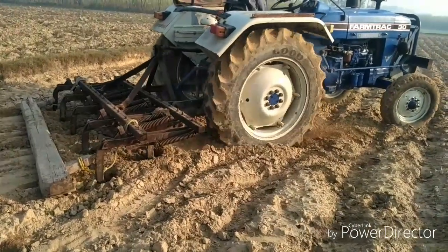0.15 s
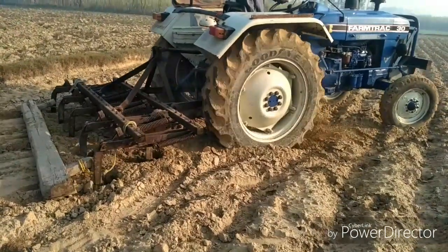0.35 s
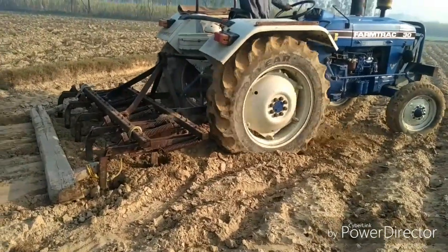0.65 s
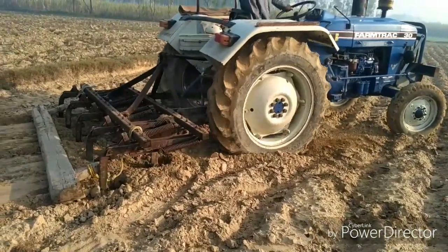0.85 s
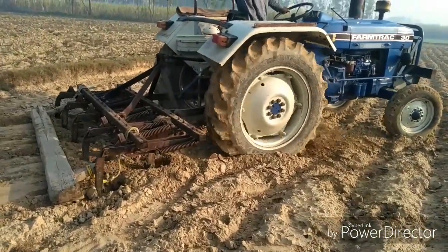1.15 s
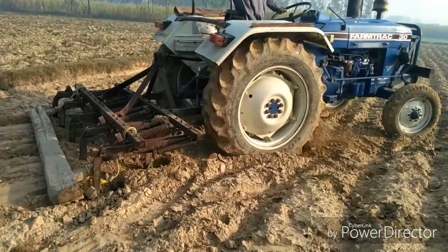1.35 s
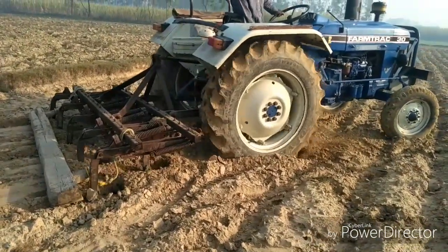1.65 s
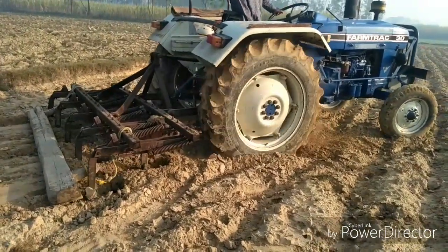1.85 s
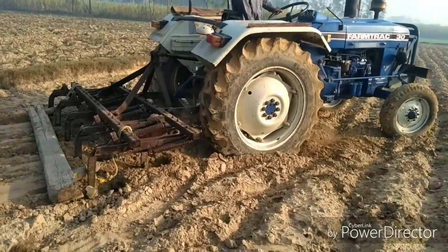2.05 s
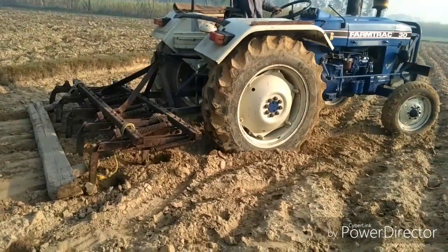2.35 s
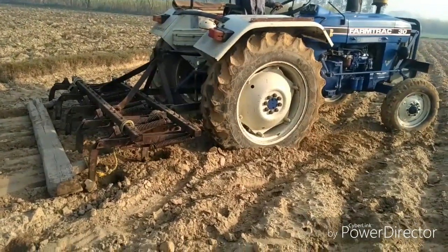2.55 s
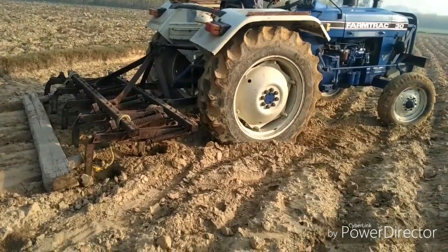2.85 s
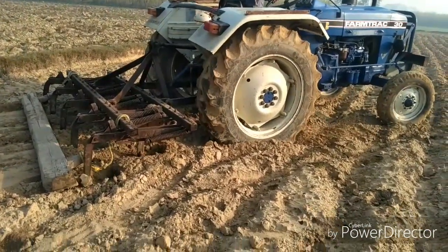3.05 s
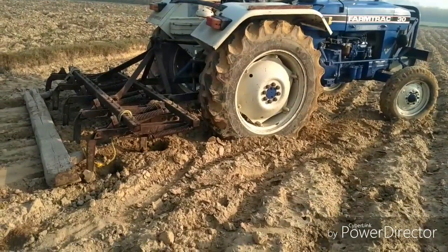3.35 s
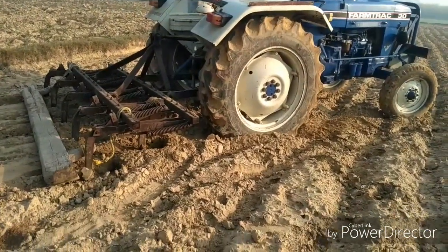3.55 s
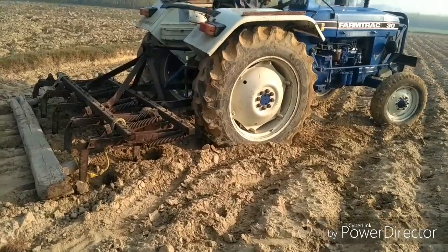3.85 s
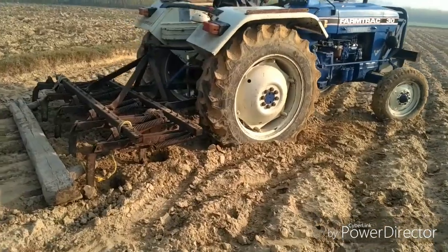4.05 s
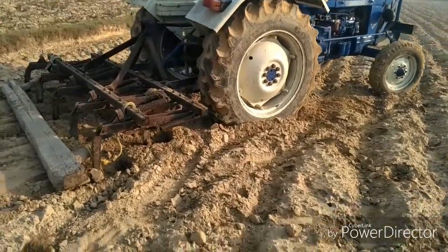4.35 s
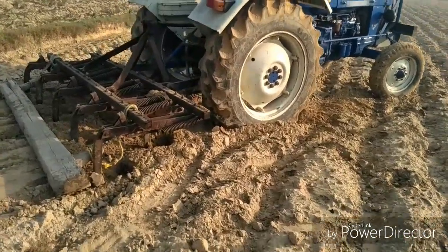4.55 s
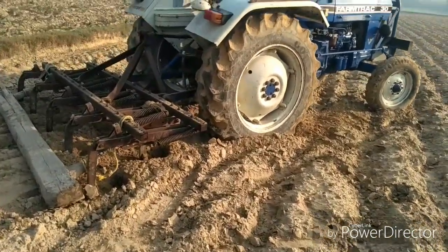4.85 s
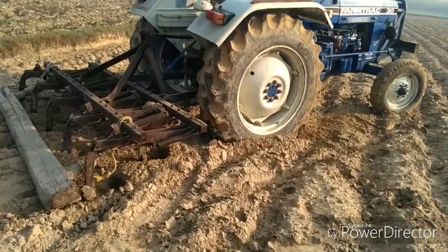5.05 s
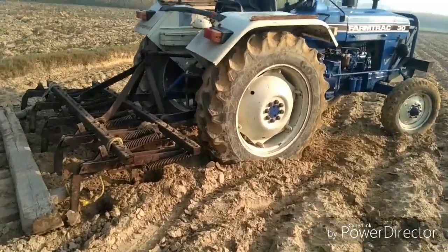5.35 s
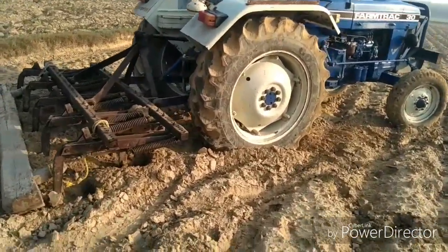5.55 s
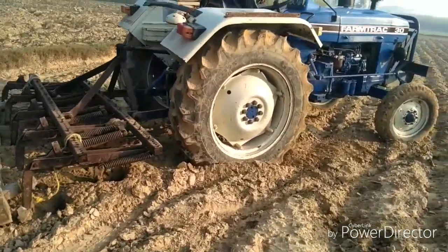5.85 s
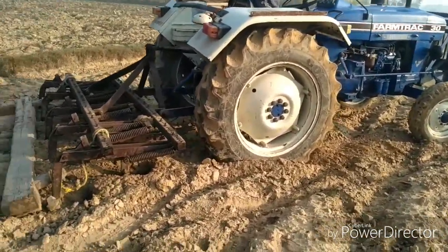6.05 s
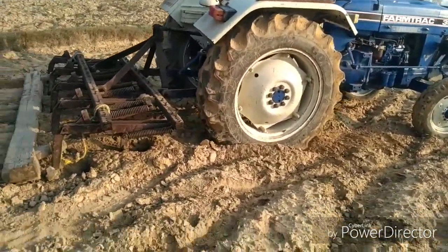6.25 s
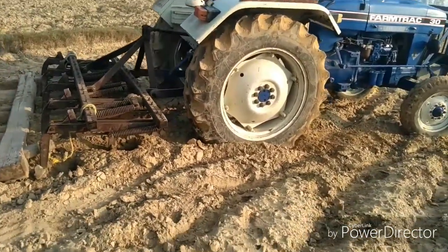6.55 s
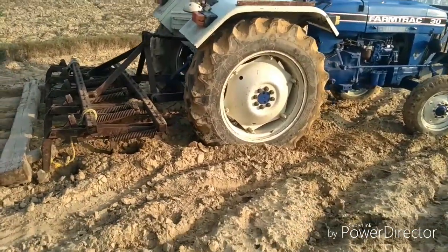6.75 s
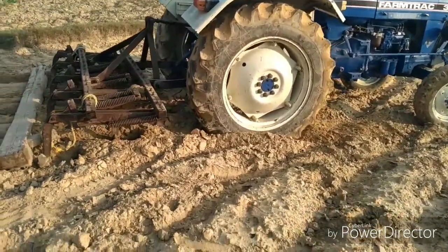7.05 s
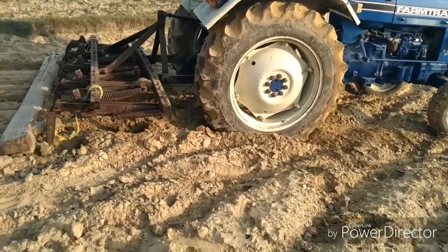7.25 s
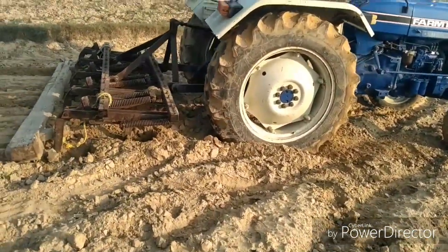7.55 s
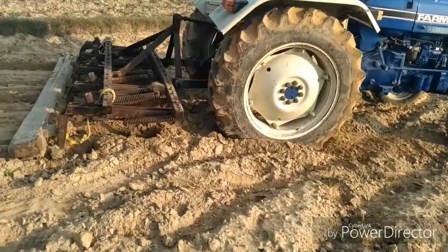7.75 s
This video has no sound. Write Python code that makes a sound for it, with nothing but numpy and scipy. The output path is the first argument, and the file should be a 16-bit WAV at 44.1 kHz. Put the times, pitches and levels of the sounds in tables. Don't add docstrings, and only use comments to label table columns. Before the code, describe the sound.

A small diesel tractor hammers under load in an open field, drops to a slow chug, revs up hard, then winds down again.

```python
import sys
import numpy as np
from scipy import signal
from scipy.io import wavfile
from scipy.ndimage import uniform_filter1d

SR = 44100
rng = np.random.default_rng(int(sys.argv[2]) if len(sys.argv) > 2 else 0)


def dump_mix(stems):
    frames = np.atleast_2d(stems).T
    limited = np.clip(frames, -1, 1)
    pcm = np.round(limited * 32767).astype(np.int16)
    wavfile.write(sys.argv[1], SR, pcm)


def gain_from_db(level_db):
    decades = np.asarray(level_db, float) / 20
    return 10 ** decades


N = 349272


def evened(x, span_s=0.22):
    size = int(span_s * SR)
    power = uniform_filter1d(uniform_filter1d(x ** 2, size=size), size=size)
    return x / np.sqrt(np.maximum(power, 1e-20))


def coloured(x, spectrum):
    size = 16384
    hz = abs(np.fft.fftfreq(size, 1 / SR))
    point_hz, point_db = np.transpose(spectrum)
    gain_db = np.interp(np.log(hz + 1), np.log(point_hz + 1), point_db)
    log_gain = np.log(gain_from_db(np.maximum(gain_db, -100)))
    taps = np.fft.ifft(np.exp(np.conj(signal.hilbert(log_gain)))).real[:size // 2]
    return signal.oaconvolve(x, taps)[:N]


def split(x, hz, kind):
    return signal.sosfilt(signal.butter(4, hz, kind, fs=SR, output="sos"), x)


def blows(firings, place, scatter_db, slack):
    luck = np.clip(rng.standard_normal((80, 2)), -1.7, 1.5)
    at = 3 * np.arange(len(luck)) + place + slack * luck[:, 0]
    out = np.zeros(N + 1)
    out[np.searchsorted(firings, at)] = gain_from_db(scatter_db * luck[:, 1])
    return out[:N]


def ring(clicks, hz, t60):
    t = np.arange(int(1.2 * t60 * SR)) / SR
    return signal.oaconvolve(clicks, gain_from_db(-60 * t / t60) * np.sin(2 * np.pi * hz * t))[:N]


def law_db(law, load, speed, flank):
    base_db, load_db, over_db, under_db, flank_db = law
    speed_db = over_db * np.maximum(speed, 0) + under_db * np.minimum(speed, 0)
    return base_db + load_db * load + speed_db + flank_db * flank


# place [firings], level_db, load_gain_db, t60_s, second_knock_gap_s, second_knock_db
KNOCKS = [
    (.6, -2, 9.5, 0.023, 0.0041, 11),
    (1.57, -4, 11, 0.046, 0.0045, 11),
    (2.59, 3, 5.5, 0.036, 0.0044, 7),
    (.2, -11, 10, 0.017, .01, -26),
    (1.2, -16.5, 9, 0.031, .01, -24),
    (1.3, -7.5, -18, 0.032, 0.011, -26),
    (1.77, 4.5, -14.5, 0.0075, .004, -12),
    (2.79, 5.5, -15, 0.013, .004, -16),
]
# place [firings], pitch_hz, level_db, t60_s, load_gain_db, speed_gain_db
RINGING_PARTS = [(1.66, 2800, 3, .045, 18, -3), (1.66, 2200, -8, .04, 12, -3), (2.62, 2080, -5, .05, 8, -3),
                 (2.66, 3350, -6, .04, -4, -3), (2.66, 2530, -7, .05, -8, 0), (2.64, 6120, -4, .04, 3, -5),
                 (.7, 4700, -8, .032, -4, 6), (2.7, 4950, -10, .02, -6, 3), (1.76, 8450, 0, .03, -4, 2),
                 (2.62, 8700, -1, .03, 3, 0), (.76, 9400, -4, .04, -4, -3), (.7, 11200, -2, .02, 0, 3),
                 (2.7, 12700, -6, .025, -3, 5), (1.78, 13700, -6, .02, -3, 8)]
# pitch_hz, level_db [dB per Hz]
HISS_BESIDE = [(710, -42), (1200, -5.5), (1510, -1), (1720, -17), (2040, -3), (2430, -7), (2760, -2.5),
               (4080, -13), (4800, -7.5), (6950, -11.5), (8720, -2), (10000, -5.5), (12300, -5),
               (15200, -16.5), (16000, -20)]
# pitch_hz, level_db [dB per Hz]
HISS_BEHIND = [(710, -36.5), (1200, 0.5), (1540, -1), (1980, -7.5), (2620, -1.5), (3290, -6), (3590, -3),
               (4170, -11.5), (4700, -5.5), (6230, -12), (7820, -8), (8720, -2.5), (13000, -4),
               (15000, -13.5), (16000, -11.5)]
# start_s, end_s
MOVE = (3.2, 4.5)


def clatter(t, firings, load, speed):
    age = np.arange(SR // 16) / SR
    power, struck = np.zeros(N), np.zeros(N)
    for place, db, load_db, t60, gap_s, second_db in KNOCKS:
        first = gain_from_db(2 * (db + load_db * load)) * blows(firings, place, 3.3, 0.0096)
        second = gain_from_db(2 * (db + second_db)) * np.roll(blows(firings, place, 2.0, 0.014), int(gap_s * SR))
        decay = gain_from_db(-120 * age / t60)
        power += signal.oaconvolve(first, decay * (1 - np.exp(-age / 0.0017)))[:N]
        power += signal.oaconvolve(second, decay * (1 - np.exp(-age / 0.0029)) ** 2)[:N]
        struck += first + second / 4

    fade = gain_from_db(-120 / (0.22 * SR))
    power += gain_from_db(-22.5 + 5.9 * speed) * signal.lfilter([1], [1, -fade], struck)
    power = evened(np.sqrt(np.maximum(power, 0))) ** 2 + gain_from_db(-21 + 3.8 * speed)

    rattle = gain_from_db(1.47 * evened(uniform_filter1d(rng.standard_normal(N), size=60)))
    drive = np.sqrt(power) * rattle * rng.standard_normal(N)
    moved = np.interp(t, MOVE, (0, 1))
    beside = evened(coloured(drive, HISS_BESIDE))
    behind = evened(coloured(drive, HISS_BEHIND))
    hiss = evened((1 - moved) * beside + moved * behind)

    rings = np.zeros(N)
    for place, hz, db, t60, load_db, speed_db in RINGING_PARTS:
        gain = gain_from_db(db + load_db * (load - 1.0) + speed_db * speed)
        rings += gain * ring(blows(firings, place, 4.0, 0.014), hz, t60)
    return hiss + gain_from_db(-0.5) * rings


# pitch_hz, level_db [dB per Hz]
ROAR_SPECTRUM = [(18, -15), (30, -27.5), (102, -1.5), (131, -0.5), (242, -12.5), (486, -15), (549, -10),
                 (794, -6), (994, -3), (1250, -13), (1560, -8), (1950, -11), (3000, -14.5), (3470, -11.5),
                 (4000, -16), (5200, -45), (8800, -120)]
# pitch_hz, level_db
STACK = [(38, -79), (50, -66.5), (60, -59.5), (72, -57), (82, -53.5), (95, -59), (108, -65)]
# pitch_hz, level_db
SILENCER = [(60, -30), (118, -11), (140, -13), (155, -18.5), (200, -16.5), (260, -27.5), (365, -19.5),
            (420, -32)]
# coasting_db, load_gain_db, overspeed_gain_db, underspeed_gain_db, flank_gain_db
PIPE_LAW = (-50.5, 9.5, -1.5, 5.5, 0)


def response(spectrum, hz):
    point_hz, point_db = np.transpose(spectrum)
    return np.interp(np.log(hz), np.log(point_hz), point_db)


def cycle_tone(order, firings):
    return np.sqrt(2) * np.sin(2 * np.pi * (order * firings / 3 + order ** 2 / 14))


def exhaust(t, firings, load, speed):
    cycle_hz = np.gradient(firings) * SR / 3
    step = 16
    slow_t, slow_firings, slow_load = t[::step], firings[::step], load[::step]
    orders = np.zeros(len(slow_t))
    for order in set(range(4, 40)) - {6, 9}:
        hz = order * cycle_hz[::step]
        waver = np.interp(slow_t, np.linspace(0, t[-1], num=40), rng.standard_normal(size=40))
        db = 1.5 * waver + response(SILENCER, hz)
        db += 4.5 * (order % 3 == 0)
        db += -10 * (1 - slow_load) * np.maximum(np.log2(hz / 148), 0)
        orders += gain_from_db(db) * cycle_tone(order, slow_firings)

    turbulence = evened(split(coloured(rng.standard_normal(N), ROAR_SPECTRUM), 260, "low"))
    turbulence *= gain_from_db(-4 * np.clip(speed, 0, 1))
    rest = signal.resample_poly(orders, step, 1)[:N] + gain_from_db(-3.0) * turbulence
    rest = split(rest, 76.5, "high")

    second = gain_from_db(response(STACK, 6 * cycle_hz) + 10 * load) * cycle_tone(6, firings)
    third = gain_from_db(response(STACK, 9 * cycle_hz) + 10 * load) * cycle_tone(9, firings)
    return second + third + gain_from_db(law_db(PIPE_LAW, load, speed, 0)) * rest


# pitch_hz, t60_s, level_db, load_gain_db,
# speed_gain_db
PANELS = [(595, .07, -10, 4.5, -1), (665, 0.029, -7, 10, -5.5), (767, 0.013, 0.5, 8, -1.5),
          (4760, 0.0076, -19.5, 0, 5), (3690, 0.01, -41, -9, -14), (1506, 0.061, -19, 3, 6),
          (1710, 0.052, -31.5, -7.5, 13), (1110, 0.21, -33, -8, 14), (393, 0.29, -20, 6, -0.5),
          (451.6, 0.077, -25, -5.5, 1.5), (288, 0.025, -13.5, 10, -1), (124.8, 0.28, -12.5, 0, 5),
          (206, 0.13, -6.5, 11, -1)]


def roar(firings, load, speed):
    firing_db = 1.27 * np.cos(2 * np.pi * (firings - 0.8))
    cycle_db = 0.95 * np.cos(2 * np.pi * (firings - 2.9) / 3)
    shake = gain_from_db(firing_db + cycle_db) * rng.standard_normal(N)
    panels = np.zeros(N)
    for hz, t60, db, load_db, speed_db in PANELS:
        gain = gain_from_db(db + load_db * (load - 1.5) + speed_db * speed)
        panels += gain * evened(ring(shake, hz, t60), span_s=1)
    return evened(evened(split(coloured(shake, ROAR_SPECTRUM), 211, "high")) + panels)


def sump(firings):
    drive = blows(firings, 2.8, 5.2, 0.0022) + 0.011 * rng.standard_normal(N)
    main_mode = evened(ring(drive, hz=985, t60=0.7), span_s=0.13)
    damped_mode = evened(ring(drive, hz=1064, t60=0.098))
    return main_mode + gain_from_db(-5.0) * damped_mode


def gears(firings):
    teeth_per_firing = 45.3
    wander = 1 + 0.004 * evened(uniform_filter1d(rng.standard_normal(N), size=1500))
    flutter = gain_from_db(2.7 * evened(uniform_filter1d(rng.standard_normal(N), size=2000)))
    return flutter * np.sin(2 * np.pi * teeth_per_firing * np.cumsum(np.gradient(firings) * wander))


# start_s, level_db, length_s, upper_partial_db, lower_partial_db
SQUEAKS = [
    (0.407, -26, 0.03, -1, -9),
    (0.522, -25.5, 0.043, 4, -7),
    (1.2206, -30, 0.028, 3, -7),
    (1.577, -29, 0.033, -2, 1),
    (2.04, -26, 0.034, -6, -5),
]
# main_hz, upper_hz, lower_hz
SQUEAK_HZ = (11000, 11900, 9200)


def squeaks():
    out = np.zeros(N)
    for start_s, db, length_s, upper_db, lower_db in SQUEAKS:
        t = np.arange(int(max(length_s, 0.005) * SR)) / SR
        tone = np.zeros(len(t))
        for partial_db, hz in zip((0, upper_db, lower_db), SQUEAK_HZ):
            tone += gain_from_db(partial_db) * np.sin(2 * np.pi * hz * t)
        out[int(start_s * SR):][:len(t)] += gain_from_db(db - 5.0) * tone * signal.windows.tukey(len(t), 0.6)
    return out


# start_s, firing_rate_hz
SPEED = [(0.0, 29.12), (0.17, 31.18), (0.61, 27.64), (1.17, 28.14), (1.38, 29.18), (1.55, 27.8),
         (2.27, 27.39), (3.28, 20.1), (3.54, 20.3), (3.72, 30.15), (3.88, 33.03), (4.05, 33.39),
         (4.65, 35.1), (5.29, 34.97), (5.69, 31.16), (6.5, 24.72), (6.95, 20.34), (7.93, 12.7)]
# start_s, load [0-1], nearness_db, flank facing the listener [0-1]
ENGINE = [(0.0, 1.0, 0.5, 0.65), (0.4, 0.99, -0.5, 0.23), (1.0, 0.89, 0, 0.05), (1.6, 0.98, 0, 0.16),
          (2.15, 0.91, -0.5, 0), (2.27, 0.84, -2, 0.7), (2.36, 0, 0.5, 0.17), (3.35, 0.04, 0, 0.14),
          (3.5, 0.76, -2.5, 0), (3.6, .95, -1, 0), (3.8, 1, -1.5, .1), (4.05, 0.51, 0, 0.05),
          (4.45, 0.53, 1.5, 0.43), (5.2, 0.57, -0.5, 1), (5.55, 0.67, -3, 1), (5.9, 0.11, 1.5, 0.36),
          (6.6, 0.12, 0.5, 0.38), (7.92, 0.15, -2.5, 0.44)]
# coasting_db, load_gain_db, overspeed_gain_db, underspeed_gain_db, flank_gain_db
CLATTER_LAW = (-42, 9, 2.5, 0.5, 1)
UNDER_LAW = (-6.5, 1.5, -1, 1, -4)
ROAR_LAW = (-45.5, 7, 0, 3, 0.5)
SUMP_LAW = (-54.5, -3.5, -0.5, 3.5, 9)
GEAR_LAW = (-73, 0, 25, 10, 0)


def scene():
    t = np.arange(N) / SR
    rate_hz = np.interp(t, *np.transpose(SPEED))
    firings = 0.5 + np.cumsum(rate_hz) / SR
    speed = (rate_hz - 28) / 8
    start_s, *columns = np.transpose(ENGINE)
    load, near_db, flank = (np.interp(t, start_s, column) for column in columns)
    load = np.clip(load, 0, 1)

    def gain(law):
        return gain_from_db(law_db(law, load, speed, flank))

    metal = clatter(t, firings, load, speed)
    upper = evened(split(metal, 7000, "high"))
    under = evened(split(metal, 7000, "low"))
    tractor = None
    metal = upper + gain(UNDER_LAW) * under
    tractor = gain(CLATTER_LAW) * metal
    tractor += exhaust(t, firings, load, speed)
    tractor += gain(ROAR_LAW) * roar(firings, load, speed)
    tractor += gain(SUMP_LAW) * sump(firings)
    tractor += gain(GEAR_LAW) * gears(firings)
    return (gain_from_db(near_db) * tractor + squeaks())[None]


def roll_off(x):
    return signal.sosfilt(signal.butter(12, 16830, fs=SR, output="sos"), x)


def record(dry):
    treble_limit = signal.firwin(511, 15700, window=("kaiser", 9), fs=SR)
    x = signal.oaconvolve(dry, treble_limit[None], "same")
    x = signal.sosfilt(signal.butter(2, 38, "high", fs=SR, output="sos"), x)
    return roll_off(x)


dry = scene()
out = record(dry)
dump_mix(out)
```